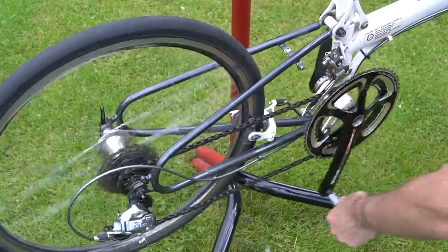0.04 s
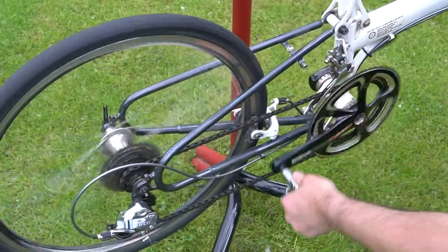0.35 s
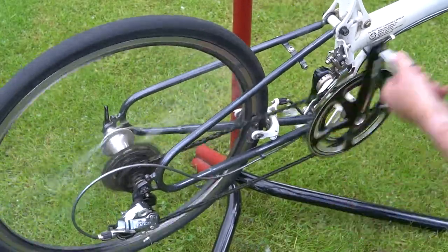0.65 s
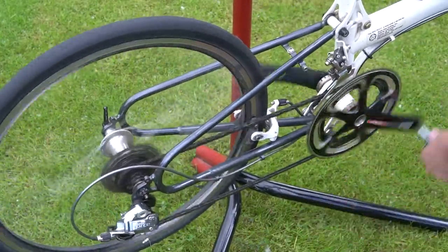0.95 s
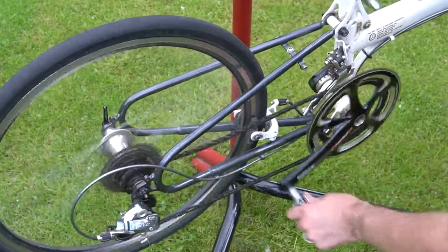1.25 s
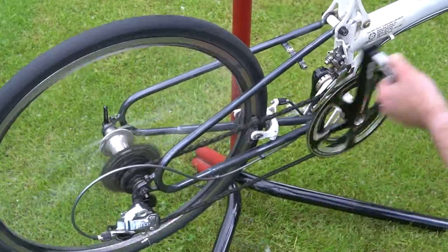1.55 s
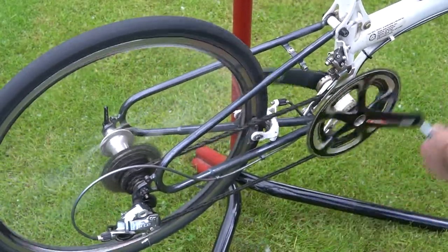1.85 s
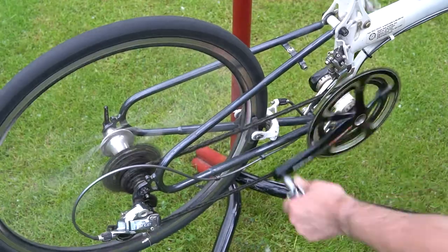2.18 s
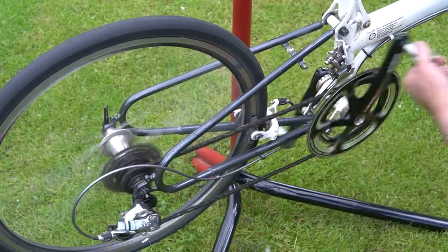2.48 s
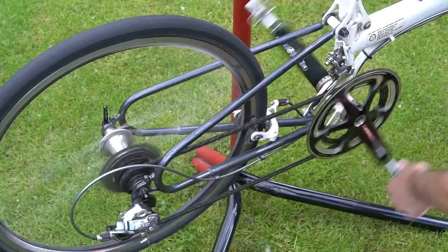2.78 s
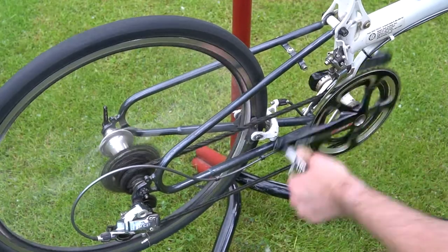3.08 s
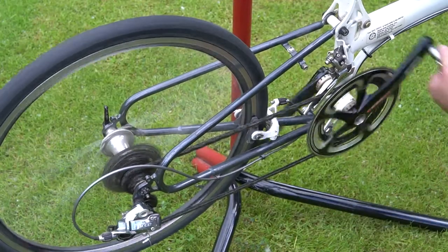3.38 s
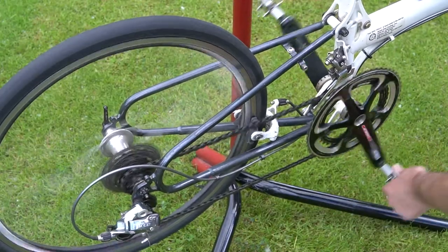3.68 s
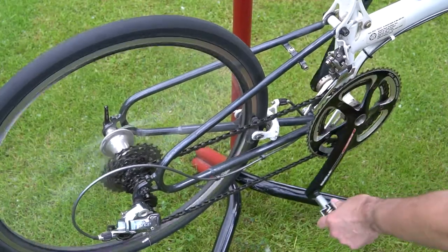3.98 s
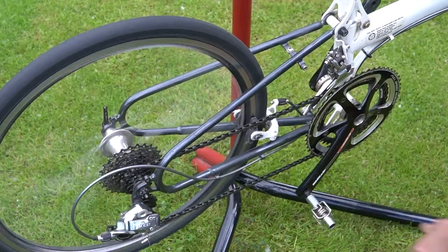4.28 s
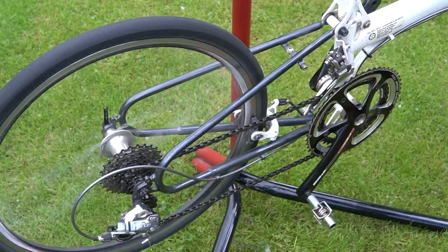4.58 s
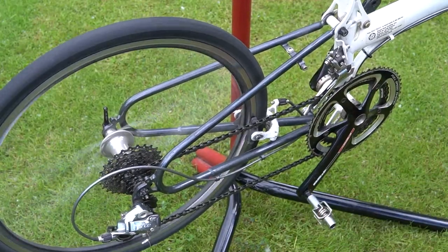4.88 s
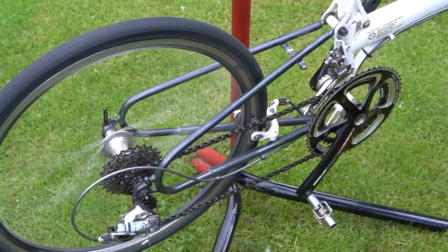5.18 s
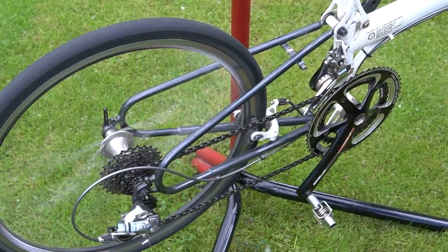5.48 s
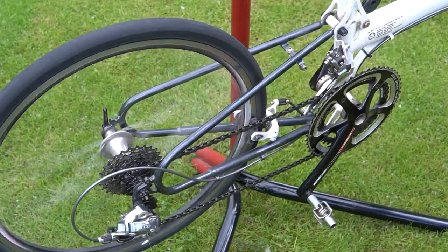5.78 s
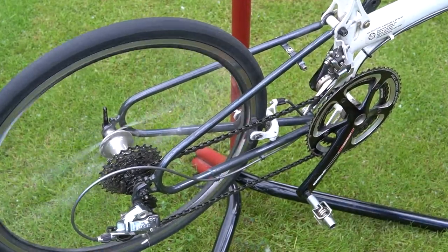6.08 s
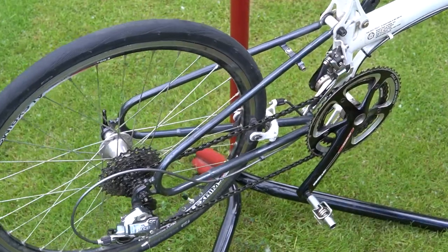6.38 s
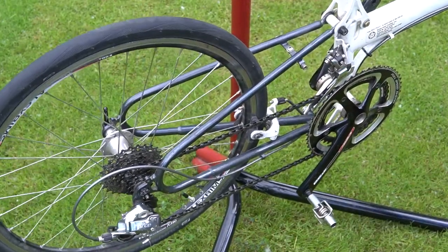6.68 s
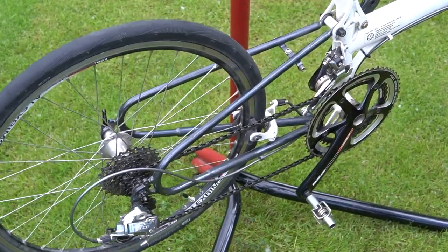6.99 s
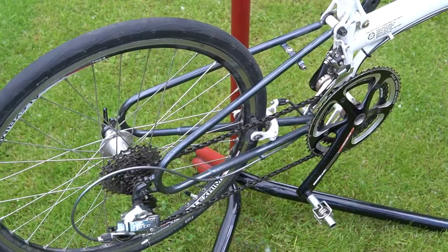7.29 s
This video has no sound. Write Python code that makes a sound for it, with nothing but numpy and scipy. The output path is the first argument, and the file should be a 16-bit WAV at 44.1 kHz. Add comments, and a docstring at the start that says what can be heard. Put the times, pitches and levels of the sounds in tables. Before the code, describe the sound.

A hand-cranked bicycle chain ticks and clacks through gears, then the freewheel buzzes and stops abruptly, outdoors in faint wind.

```python
"""Bicycle on a repair stand

A bicycle on a lawn is cranked by hand: the chain ticks over the cogs and clacks through the gears.
The hand lets go and the freewheel pawls buzz until the brake stops the wheel; the brake lets go with
two clicks. Each impact is a short excitation, coloured by the resonances of the metal it strikes.
Light wind rumbles on the microphone over a distant outdoor wash."""
import sys
import numpy as np
from scipy import signal
from scipy.fft import rfft, irfft, next_fast_len
from scipy.io import wavfile

SR = 44100
rng = np.random.default_rng(int(sys.argv[2]) if len(sys.argv) > 2 else 0)


def digitize_waveform(pressure):
    """Quantize a signal to 16-bit integers and store it at the path in sys.argv[1].

    Rows of a 2-D input are taken as channels; values are limited to [-1, 1].
    """
    field = np.atleast_2d(pressure).T
    bounded = np.clip(field, -1, 1)
    quanta = np.round(bounded * 32767).astype(np.int16)
    wavfile.write(sys.argv[1], SR, quanta)


N = 328479
TIME = np.arange(N) / SR
COAST_S = 3.6405  # the wheel starts to overrun the cassette

# The pace of the hand on the crank. Each row: time in seconds, chain speed in links per second.
CHAIN_SPEED = [(.3405, 23.76), (.57, 38.6), (1.168, 46.73), (1.595, 40.73), (1.828, 44.17), (2.429, 45.45),
               (3.127, 48.14), (3.206, 44.25), (3.6, 41.72)]
# Chain rubs on the derailleur. Each row: centre in seconds, relative level in dB, half width in seconds.
SHIFT_RUBS = [(0.648, 5.5, 0.078), (1.164, 12, 0.086), (1.42, 3.5, .11), (3.48, 2, 0.2)]


def amp(db):
    """Decibels as an amplitude ratio."""
    return 10 ** (np.asarray(db) / 20)


def unit_rms(x):
    """Normalisation to a mean power of 1."""
    return x / np.sqrt(np.mean(x ** 2) + 1e-20)


def unit_energy(x):
    """Normalisation of each row to an energy of 1."""
    return x / (np.linalg.norm(x, axis=-1, keepdims=True) + 1e-20)


def at_time(rows, t):
    """Linear interpolation in time."""
    return np.interp(t, *np.transpose(rows))


def at_hz(rows, hz):
    """Interpolation on a logarithmic frequency axis."""
    f, value = np.transpose(rows)
    return np.interp(np.log(hz + 1), np.log(f + 1), value)


def pan(db):
    """Stereo gains for a level difference, left minus right."""
    return amp([[db / 2], [-db / 2]])


def add(mix, s, sound):
    """Superposition of a sound on the mix, from s seconds on."""
    part = mix[:, max(round(s * SR), 0):][:, :sound.shape[-1]]
    part += sound[:, :part.shape[-1]]


def pair(z, coherence):
    """Partial coherence: two independent signals mix into a correlated left and right."""
    return np.array([z[0], coherence * z[0] + np.sqrt(1 - coherence ** 2) * z[1]])


def swell(t, s, half_s):
    """A Gaussian envelope: 1 at time s, 1/e at half_s to either side."""
    return np.exp(-((t - s) / half_s) ** 2)


def wander(top_hz, count=20):
    """Slow sinusoids in random phase sum to an irregular drift."""
    t = TIME[::256]
    rates = np.geomspace(top_hz / 10, top_hz, count)
    drift = sum(np.sin(2 * np.pi * (hz * t + rng.random())) for hz in rates)
    return np.interp(TIME, t, unit_rms(drift))


def passes(t, speed, offset=0):
    """Distance is the integral of speed; this gives the time at which each tooth or link comes by."""
    travelled = np.cumsum(speed) / SR
    return np.interp(np.arange(offset, travelled[-1]), travelled, t)


def colour(x, spectrum, modes=(), size=4096):
    """Minimum-phase filtering by a spectrum (Hz, dB) with resonances (Hz, width in Hz, lift in dB)."""
    hz = abs(np.fft.fftfreq(size, 1 / SR))
    db = at_hz(spectrum, hz) + sum(lift / (1 + (2 * (hz - f) / width) ** 2) for f, width, lift in modes)
    transfer = np.exp(np.conj(signal.hilbert(np.log(amp(db)))))
    response = np.fft.ifft(transfer).real[:size // 2]
    return signal.oaconvolve(x, unit_energy(response)[None], axes=1)[:, :x.shape[1]]


def die_away(x, decay):
    """Frequency-dependent damping: each band takes a unit-energy envelope with its own t60."""
    size = x.shape[-1]
    hz, t, spectrum = np.fft.rfftfreq(size, 1 / SR), np.arange(size) / SR, rfft(x)
    centres, t60s = np.transpose(decay)
    bands = (irfft(spectrum * np.interp(hz, centres, band), size) for band in np.eye(len(decay)))
    return sum(band * unit_energy(amp(-60 * t / t60)) for band, t60 in zip(bands, t60s))


def burst(t60, coherence, size=8192):
    """The dense modes of an impact, as exponentially decaying stereo noise of unit energy."""
    envelope = amp(-60 * np.arange(size) / SR / t60)
    return unit_energy(pair(rng.standard_normal((2, size)), coherence) * envelope)


def noise(spectrum):
    """Steady stereo noise, most coherent at long wavelengths."""
    # Likeness of left and right. Each row: frequency in Hz, coherence from 0 to 1.
    coherence = [(60, .94), (200, .9), (500, .8), (1000, .87), (3000, .65), (12000, .5)]
    size = next_fast_len(N, True)
    hz = np.fft.rfftfreq(size, 1 / SR)
    white = pair(rfft(rng.standard_normal((2, size))), at_hz(coherence, hz))
    return unit_rms(irfft(white * amp(at_hz(spectrum, hz)), size)[:, :N])


def outdoors(wash_db=-67.5, wind_db=-67.5):
    """Turbulent pressure on the microphone rumbles and bumps over a distant broadband wash."""
    # Spectra of the wash and the wind. Each row: frequency in Hz, relative density in dB.
    wash_spectrum = [(100, -22), (170, -11.5), (196, -3), (353, -5), (386, -5.5), (469, -5), (522, -8),
                     (719, -1.5), (957, -3), (1520, -13), (1820, -15), (1950, -16), (2740, -16),
                     (4930, -26), (12000, -31.5), (15600, -62), (22000, -120)]
    wind_spectrum = [(12, -39.5), (20, -22), (48, 0), (86, 2.5), (125, 0.5), (173, -15), (210, -16),
                     (260, -13), (340, -37), (570, -120)]
    # Gusts. Each row: centre in seconds, lift in dB, half width in seconds.
    gusts = [(1.22, 5, .22), (1.9, 2.5, 0.26), (2.85, 4.5, 0.14), (3.85, 5, 0.27), (5.784, 10.5, 0.14),
             (7.35, 4, .18)]
    # Low bumps. Each row: centre in seconds, level in dB, frequency in Hz, half width in seconds.
    bumps = [(1.3, -58, 203, 0.0083), (5.711, -47, 70, 0.0077), (5.739, -46, 75, 0.011),
             (5.749, -38, 116, 0.003), (5.83, -52, 110, .006)]
    lull_db = -3 * swell(TIME, s=6.67, half_s=0.28)
    gust_db = sum(db * swell(TIME, s, half_s) for s, db, half_s in gusts) + 0.2 * wander(top_hz=3)
    wash = amp(wash_db) * noise(wash_spectrum)
    wind = amp(wind_db + gust_db) * noise(wind_spectrum)
    out = amp(lull_db) * (wash + wind)
    t = np.arange(-1024, 1024) / SR
    for s, db, hz, half_s in bumps:
        pulse = swell(t, 0, half_s) * np.cos(2 * np.pi * hz * t)
        add(out, s + t[0], -amp(db) * pulse[None])
    return out * pan(-1.25)


def pawl_times(teeth_per_s=119.52, drag_teeth_per_s2=3.785, brake_s=6.129, braking_s=0.086, end_s=6.18):
    """Relative motion sets the pawl rate: wheel speed, cut by drag and the brake, times cassette slip."""
    # The cassette falls behind the wheel. Each row: time in seconds, slip from 0 to 1.
    slip = [(3.6405, .2254), (3.6814, .432), (3.7569, .4876), (3.8161, .3937), (4.0195, .7892), (4.2733, 1)]
    t = np.arange(COAST_S, end_s, 1 / SR)
    coasting = teeth_per_s - drag_teeth_per_s2 * (t - COAST_S)
    braking = np.clip(1 - (t - brake_s) / braking_s, 0, 1)
    return passes(t, coasting * braking * at_time(slip, t))


def freewheel(level_db=-17, teeth=22, tooth_share=0.51, coherence=0.62, rise_s=0.00015, size=3072):
    """Impact excitation: a pawl drops off each tooth and rings the hub; rapid drops fuse into a buzz."""
    # Single drops while the chain is slack. Each row: time in seconds, relative level in dB.
    lone_drops = [(0.118, -19), (.54, -22.5), (1.2814, -0.5), (1.294, 1.5), (3.2885, -2), (3.3463, -3),
                  (3.351, -3), (6.195, -13.5)]
    # Broad response of the hub. Each row: frequency in Hz, relative gain in dB.
    hub_spectrum = [(760, -44), (1300, -29), (1580, -25.5), (1980, -12.5), (2440, -12), (2990, 0.5),
                    (3490, -1.5), (3950, -6.5), (5000, -8.5), (5960, -12), (9370, -4), (10700, -7),
                    (12200, -2.5), (15200, -14.5)]
    # Resonances of hub and cassette. Each row: frequency in Hz, width in Hz, lift in dB.
    hub_modes = [(2075, 410, 4.5), (2960, 217, 4.5), (3460, 157, 4), (4890, 110, 5.5), (5430, 160, 4),
                 (7130, 11, 10), (8590, 36, 7), (9560, 110, 6), (10770, 90, 4.5), (12300, 270, 2),
                 (14720, 1700, 10)]
    # Damping of the hub. Each row: frequency in Hz, t60 in seconds.
    hub_decay = [(1900, 0.14), (3100, 0.1), (5000, 0.044), (9000, 0.032), (14000, .022)]
    # The ring common to all drops. Each row: frequency in Hz, share of the power.
    hub_repeat = [(1500, .85), (1900, .5), (2400, .4), (3200, .15), (8000, .08)]
    drops = pawl_times()
    force_db = 6 - 8.5 * np.exp(-(drops - COAST_S) / 0.083)  # soft at first, then at full force
    force_db += 1.2 * rng.standard_normal(len(drops))
    force_db += 0.29 * np.sin(2 * np.pi * np.arange(len(drops)) / teeth)  # the hub is slightly off centre
    drops += 0.00004 * rng.standard_normal(len(drops))
    strikes = np.vstack([np.c_[drops, force_db], lone_drops])
    # each tooth has its own click, which returns every turn
    tooth_noise = rng.standard_normal((teeth, 2, size))[np.arange(len(strikes)) % teeth]
    fresh_noise = rng.standard_normal(tooth_noise.shape)
    rattle = np.sqrt(tooth_share) * tooth_noise + np.sqrt(1 - tooth_share) * fresh_noise
    # the low modes answer every drop alike, so they form harmonics of the tooth rate
    alike = at_hz(hub_repeat, np.fft.rfftfreq(size, 1 / SR))
    common = rfft(rng.standard_normal((2, size)))
    rattle = irfft(np.sqrt(1 - alike) * rfft(rattle) + np.sqrt(alike) * common, size)
    attack = 1 - np.exp(-np.arange(size) / SR / rise_s)
    out = np.zeros((2, N))
    for (s, db), ring in zip(strikes, die_away(rattle, hub_decay)):
        snap = 0.21 * burst(0.0055, coherence, size)
        add(out, s - rise_s, amp(db) * attack * (pair(ring, coherence) + snap))
    out = colour(out, hub_spectrum, hub_modes)
    treble = signal.sosfilt(signal.butter(1, 3200, "high", fs=SR, output="sos"), out)
    return amp(level_db) * (out - treble + treble * pan(4.5))  # the treble beams to the left


def rub_gain(t, rest_db=-32):
    """Friction on the derailleur swells around a shift."""
    return amp(rest_db) + sum(amp(db) * swell(t, s, half_s) for s, db, half_s in SHIFT_RUBS)


def link_db(t, cruise_links_per_s=45, db_per_doubling=6.5, rub_lift_db=4):
    """Impact level grows with chain speed, and while the chain rubs."""
    doublings = np.log2(at_time(CHAIN_SPEED, t) / cruise_links_per_s)
    hardest_rub = amp(max(db for _, db, _ in SHIFT_RUBS))
    return -1.8 + db_per_doubling * doublings + rub_lift_db * rub_gain(t) / hardest_rub


def link_seating(links, ping_db=-56, tick_db=-44, ping_hz=3560, sweep_hz=700, rise_s=0.0014):
    """Dispersion: bending waves arrive treble first, so a seating link clicks, then pings onto a note."""
    # Links that snap hard onto the cog. Each row: time in seconds, relative level in dB.
    hard_links = [(1.019, 3.5), (1.152, 3), (1.441, 7.5), (1.958, 6.5), (2.380, 3), (2.92, 6), (3.028, 4),
                  (3.153, 5.5), (3.468, 3)]
    hard_s = np.transpose(hard_links)[0]
    soft_s = np.array([s for s in links if abs(s - hard_s).min() > 0.008])
    force, lateness = rng.standard_normal((len(soft_s), 2)).T
    glides = rng.random(len(soft_s)) < 0.2  # these links seat with hardly a ping
    soft_db = link_db(soft_s) + 3 * np.clip(force, -2, 1) - 8 * glides
    soft_links = np.c_[soft_s + 0.0008 * lateness, soft_db]
    pings, ticks = np.zeros((2, 2, N))
    t = np.arange(1024) / SR
    envelope = t / rise_s * np.exp(1 - t / rise_s)
    stereo_phase = np.array([[0], [0.6]])
    for s, db in np.vstack([soft_links, hard_links]):
        detune, bite, start_phase = rng.standard_normal(3)
        hz = ping_hz * (1 + 0.0062 * detune) + sweep_hz * np.exp(-t / 0.00049)
        phase = 2 * np.pi * np.cumsum(hz) / SR + start_phase + stereo_phase
        add(pings, s, amp(db) * envelope * np.sin(phase))
        add(ticks, s - 0.0007, amp(db + 2 * bite) * burst(t60=0.0067, coherence=0.086, size=len(t)))
    ticks = colour(ticks, [(2000, -28), (3300, -10), (4000, -3), (4700, 0), (5400, -3), (6400, -17),
                           (8500, -15), (14000, -36)])
    return amp(ping_db) * pings + amp(tick_db) * ticks


def derailleur_rub(links, level_db=-46):
    """Sliding friction: each link scrapes the derailleur in a burst of noise."""
    out = np.zeros((2, N))
    for s in links:
        add(out, s, rub_gain(s) * amp(3 * rng.standard_normal()) * burst(t60=0.022, coherence=0.5))
    return amp(level_db) * colour(out, [(800, -3), (3000, 3), (6000, -11), (9000, -4), (15000, -5)])


def jockey_wheel(links, level_db=-46.5):
    """Meshing impacts: each link ticks on the jockey wheel and excites high resonances."""
    out = np.zeros((2, N))
    for s in links:
        add(out, s, amp(link_db(s) + 2.2 * rng.standard_normal()) * burst(t60=0.014, coherence=0.7))
    spectrum = [(1500, -20), (3600, -4), (6300, -13), (8300, -2), (10000, -11), (15000, -32)]
    return amp(level_db) * colour(out, spectrum, modes=[(8350, 1200, 3), (10600, 400, 4)])


def chain(rustle_db=-71, run_out_s=0.25):
    """Impacts recur at the link rate over a rustle of rolling contact, which fades as cranking ends."""
    # Rustle of rollers and jockey wheels. Each row: frequency in Hz, relative density in dB.
    rustle_spectrum = [(710, -41), (1200, -16), (2680, -11.5), (3250, -5), (3600, -4), (4080, -6),
                       (6540, -25), (8640, -17), (12000, -37), (14000, -57)]
    t = np.arange(CHAIN_SPEED[0][0], CHAIN_SPEED[-1][0], 1 / SR)
    speed = at_time(CHAIN_SPEED, t)
    links = passes(t, speed)
    contacts = link_seating(links) + derailleur_rub(links)
    jockey = jockey_wheel(passes(t, speed, offset=0.74))
    running = np.interp(TIME, [0, t[0], t[-1], t[-1] + run_out_s], [0, 1, 1, 0])
    rustle = amp(rustle_db + link_db(TIME)) * running * noise(rustle_spectrum)
    return (contacts + rustle) * pan(4) + jockey * pan(7)


def cage_rattles(level_db=-35, t60=0.18):
    """Glancing impacts: the chain brushes the derailleur cage in short, soft rattles."""
    # Touches on the cage. Each row: start in seconds, relative level in dB.
    rattles = [(0.369, -0.5), (.432, -1.5), (.955, 7.5), (1.026, 1.5), (1.133, 1.5), (1.164, -1), (3.09, 4)]
    out = np.zeros((2, N))
    for s, db in rattles:
        add(out, s, amp(level_db + db) * burst(t60, coherence=0.32))
    return colour(out, [(600, -18), (1400, 6.5), (2400, 5), (3400, 6), (5000, -11), (14000, -19)])


def gear_clacks(level_db=-15, shiver_t60=0.54, coherence=0.83):
    """Free vibration: the chain jumps a cog with a crack, then the frame rings and the chain shivers."""
    # Gear changes. Each row: start in seconds, relative level, bass tilt and treble tilt in dB,
    # t60 of the crack in seconds, tail relative to crack in dB, left minus right in dB.
    clacks = [(.7245, -11, 5, -4, 0.09, -4, 3), (.766, -17.5, -5, -17, .12, -3, 6),
              (.844, -14, -5, -22, .15, -4, 4), (0.9136, 1, 4, 12.5, 0.028, -16, -3),
              (1.1008, -1, 10.5, 19, 0.029, -12, -3.5), (1.305, -5.5, 6, 20, 0.037, -8.5, -1),
              (1.461, -18.5, 12, 4, .05, -1.5, 3), (1.714, -5.5, -4, -1.5, 0.073, 1, 3),
              (2.639, -13.5, -17, -9, 0.049, -6, 7.5), (2.687, -16, -19, -19, .067, -3.5, 7),
              (3.5145, -7.5, 4, 5, 0.099, 1, 4)]
    # Broad response of the frame. Each row: frequency in Hz, relative gain in dB.
    frame_spectrum = [(300, -19), (700, -14.5), (1400, -1), (2400, -1.5), (3600, 8), (4800, -4),
                      (6500, -15.5), (8500, -15.5), (11000, -28), (16000, -23)]
    # Modes of the frame. Each row: frequency in Hz, relative level in dB, t60 in seconds.
    frame_modes = [(824, -1, 0.34), (1040, -28, 0.2), (1336, 2.5, 0.11), (1560, -5, .1), (1940, 4, 0.11),
                   (2290, 0, 0.29), (2590, 1.5, .25), (2760, -13, 0.14), (2950, 5.5, 0.16), (3540, 4, 0.17)]
    shiver_spectrum = [(300, -16), (800, 3), (3000, -2), (6000, -16), (15000, -54)]
    out, t = np.zeros((2, N)), np.arange(SR // 2) / SR
    for s, db, bass_db, treble_db, t60, tail_db, pan_db in clacks:
        tilt = [(1300, bass_db), (3200, 0), (8000, treble_db)]
        spectrum = [(hz, gain_db + at_hz(tilt, hz)) for hz, gain_db in frame_spectrum]
        crack = colour(burst(t60, coherence, len(t)), spectrum)
        ring = sum(amp(mode_db - 60 * t / mode_t60) * np.sin(2 * np.pi * (hz * t + rng.random()))
                   for hz, mode_db, mode_t60 in frame_modes)
        shiver = colour(burst(shiver_t60, coherence, len(t)), shiver_spectrum)
        tail = amp(tail_db) * unit_energy(unit_energy(ring) + 0.88 * shiver)
        add(out, s, amp(level_db + db) * pan(pan_db) * (crack + tail))
    return out


def brake_release(t60=0.027, width_hz=1000):
    """Heavily damped impacts: the brake arms spring open with dry clicks."""
    # Each row: start in seconds, level in dB, resonance in Hz, its lift in dB, left minus right in dB.
    clicks = [(6.8195, -29.5, 3170, 9, 2), (6.867, -26, 4200, 11.5, -9), (6.8724, -32, 4200, 6, -2)]
    spectrum = [(500, -11.5), (1400, -4.5), (3000, -4), (7000, -13), (11000, -28), (15000, -36)]
    out = np.zeros((2, N))
    for s, db, hz, lift_db, pan_db in clicks:
        click = colour(burst(t60, coherence=0.64), spectrum, modes=[(hz, width_hz, lift_db)])
        add(out, s, amp(db) * pan(pan_db) * click)
    return out


def arrival_lag(x):
    """Path difference: the bicycle stands to the left, so the right channel lags slightly."""
    # Lag of the right channel. Each row: frequency in Hz, phase in radians.
    phase_lag = [(500, .05), (2000, .2), (4000, .55), (8000, .45), (14000, .7)]
    size = next_fast_len(N, True)
    lag = np.exp(-1j * at_hz(phase_lag, np.fft.rfftfreq(size, 1 / SR)))
    right = irfft(rfft(x[1], size) * lag, size)[:N]
    return np.array([x[0], right])


def yard_scatter(x, delay_s=0.0083):
    """Scattering from the ground, fences and walls leaves a diffuse tail."""
    # Decay of the scattered sound. Each row: frequency in Hz, t60 in seconds.
    decay = [(500, .4), (2000, 0.39), (4000, 1), (8000, .35), (14000, 0.53)]
    tail = unit_energy(die_away(rng.standard_normal((2, SR // 2)), decay))
    out = np.zeros((2, N))
    add(out, delay_s, signal.oaconvolve(x, tail, axes=1))
    return out


def scene(scatter_db=-22):
    """Superposition of the bicycle's direct sound, its faint scatter and the open air."""
    bicycle = arrival_lag(freewheel() + chain() + gear_clacks() + cage_rattles() + brake_release())
    return bicycle + amp(scatter_db) * yard_scatter(bicycle) + outdoors()


def record(dry):
    """Band limiting: a linear-phase low-pass filter removes the highest treble."""
    low_pass = signal.firwin(1023, cutoff=15900, window=("kaiser", 9), fs=SR)
    return signal.oaconvolve(dry, low_pass[None], "same")


dry = scene()
out = record(dry)
digitize_waveform(out)
```